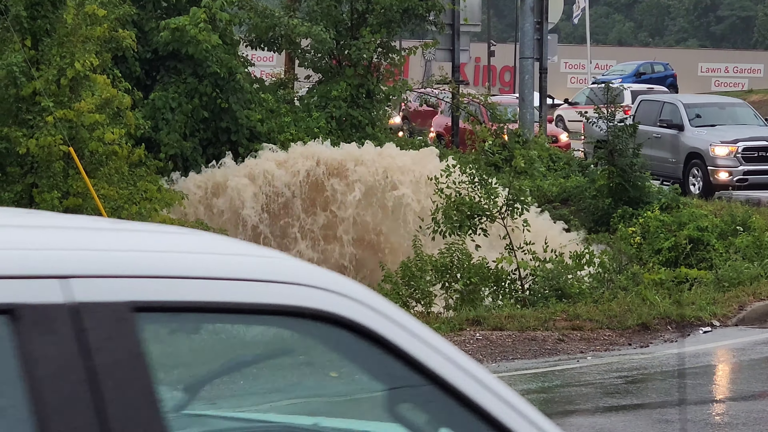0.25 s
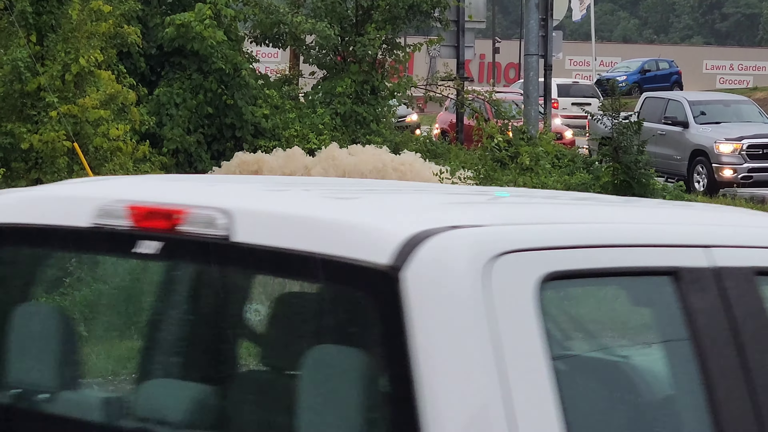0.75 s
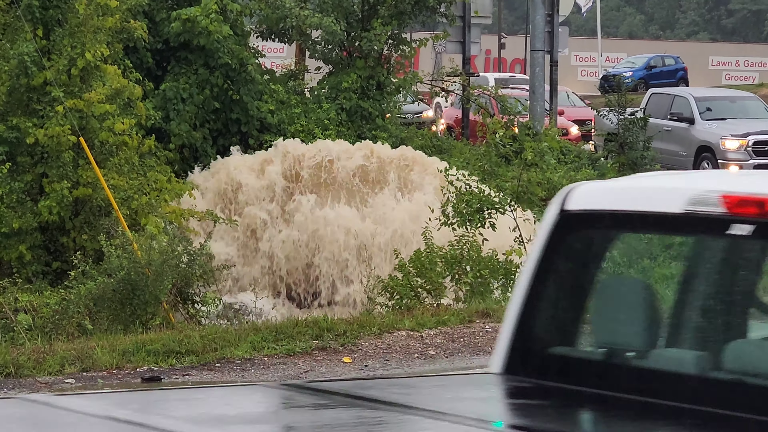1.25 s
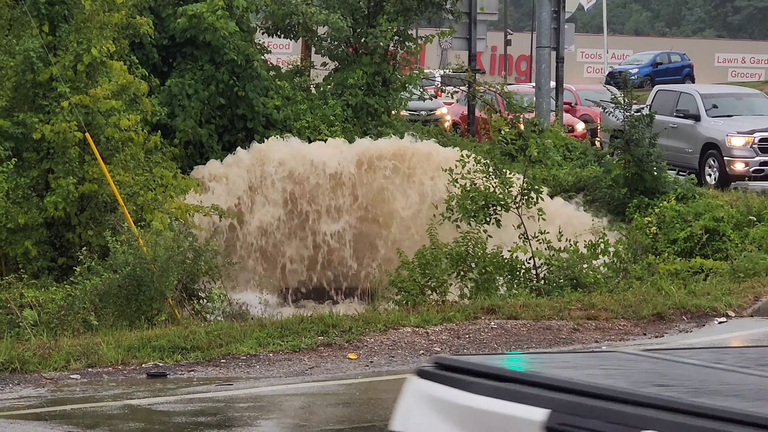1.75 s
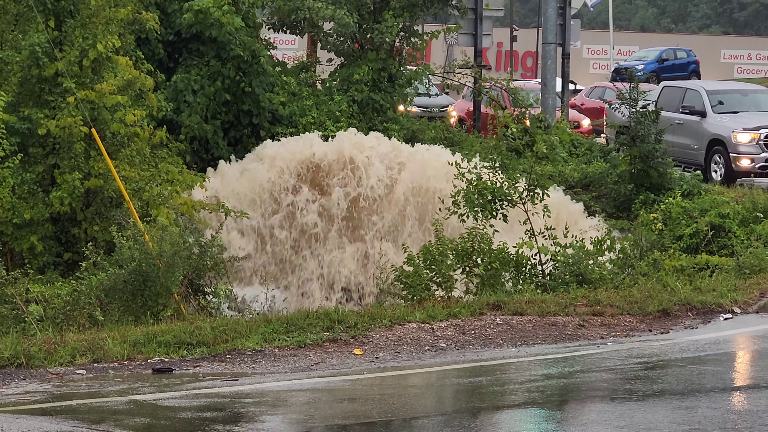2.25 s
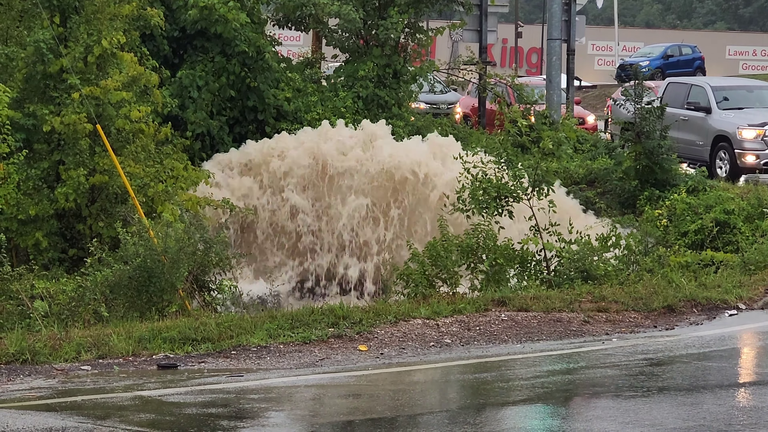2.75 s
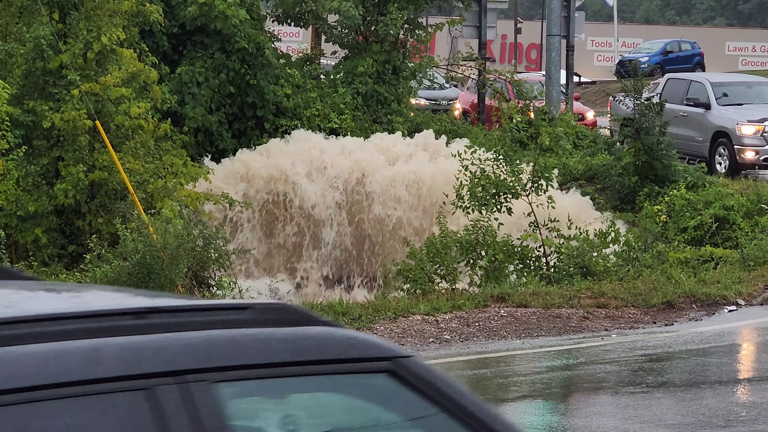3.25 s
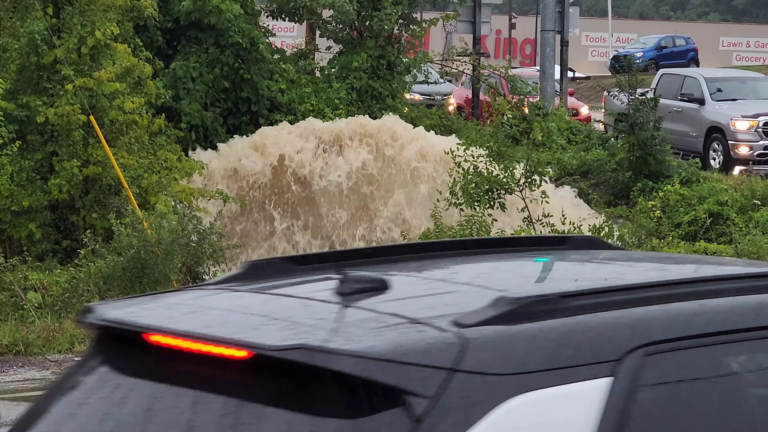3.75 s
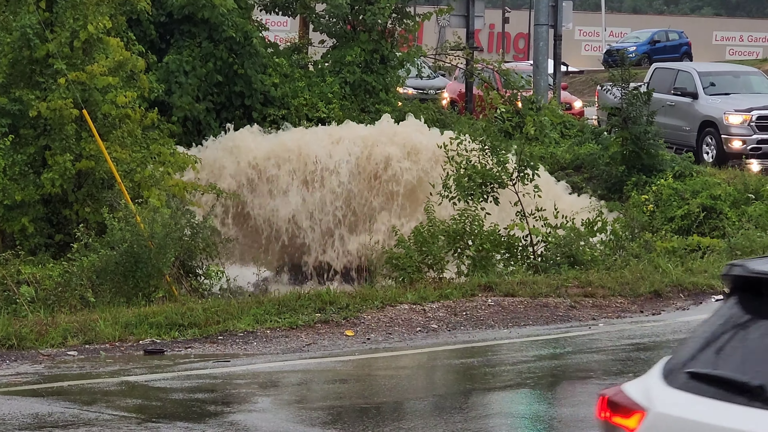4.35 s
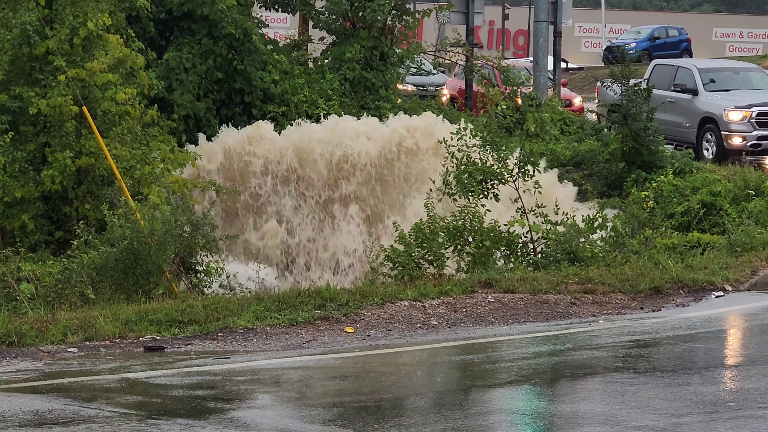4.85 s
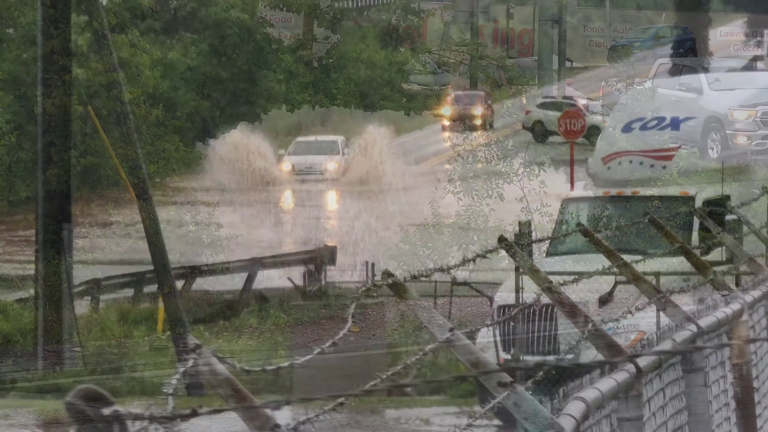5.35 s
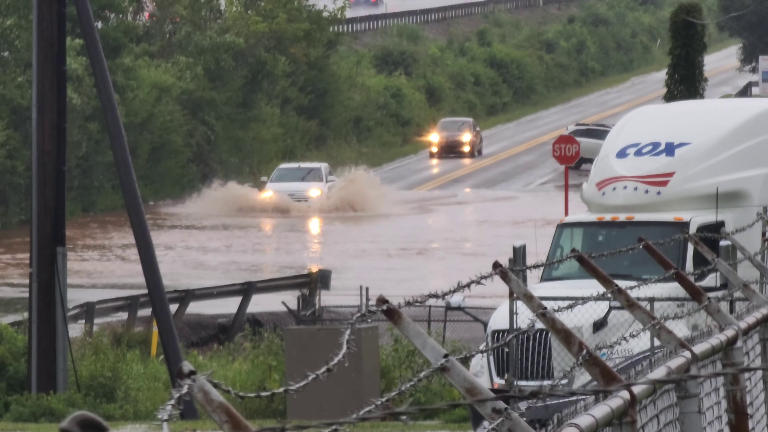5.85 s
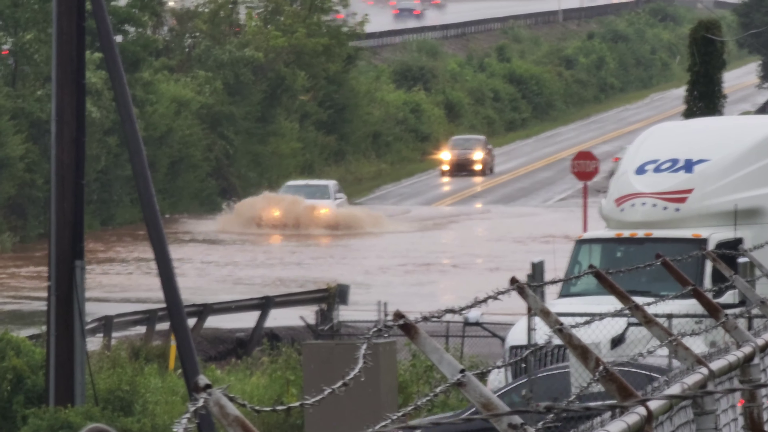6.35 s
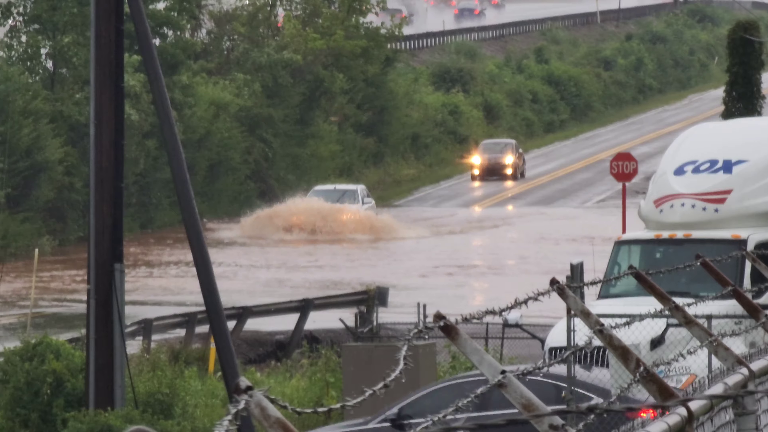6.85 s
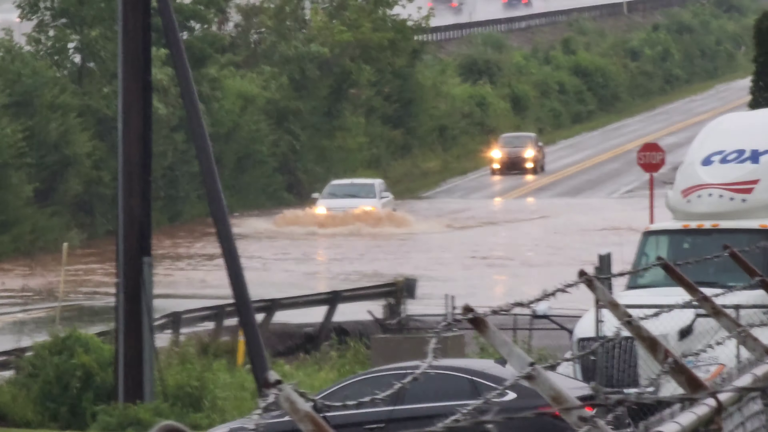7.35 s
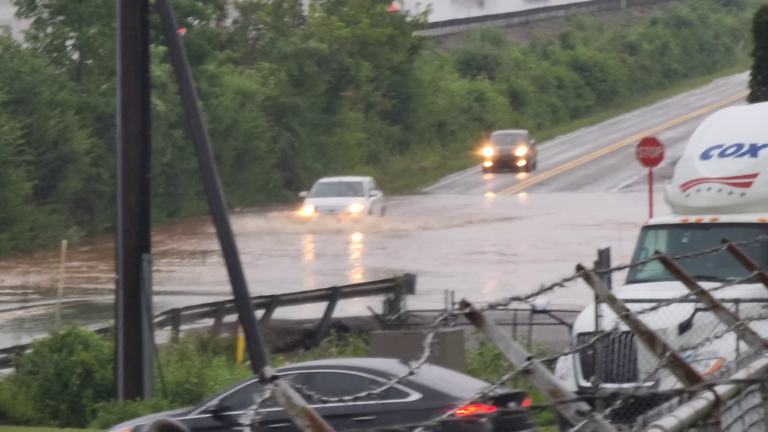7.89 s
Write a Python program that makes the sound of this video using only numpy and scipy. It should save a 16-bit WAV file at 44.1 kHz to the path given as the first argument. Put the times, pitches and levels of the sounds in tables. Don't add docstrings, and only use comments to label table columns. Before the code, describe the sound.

Floodwater rushes continuously, bright and broad, while engines hum low and tyres swish across wet asphalt. A quick metallic rattle comes early, with a few sharp drips and light knocks later. After a smooth crossfade midway, a car ploughs through water with a burst of hiss, spray ebbs over engine drone and faint fan air, and a far but powerful thunder peal rumbles. Open air, wide stereo, wind on the microphone.

```python
import sys
import numpy as np
from scipy import signal
from scipy.fft import rfft, irfft, next_fast_len
from scipy.io import wavfile
from scipy.ndimage import uniform_filter1d, map_coordinates

SR = 44100
rng = np.random.default_rng(int(sys.argv[2]) if len(sys.argv) > 2 else 0)


def inscribe(sig):
    pcm = np.round(np.clip(np.atleast_2d(sig).T, -1, 1) * 32767)
    wavfile.write(sys.argv[1], SR, pcm.astype(np.int16))


def volts_from_decibels(level):
    exponent = np.asarray(level, float) / 20
    return 10 ** exponent


N = 358091
DISSOLVE_START_S, DISSOLVE_END_S = 4.87, 5.68


def unit(x):
    return x / np.sqrt(np.mean(x ** 2) + 1e-20)


def along(points, hz):
    f, *columns = np.transpose(points)
    return np.array([np.interp(np.log(hz + 1), np.log(f + 1), c) for c in columns])


def closed(spectrum):
    floor = [-120] * (len(spectrum[0]) - 1)
    return [(spectrum[0][0] / 4, *floor)] + list(spectrum) + [(spectrum[-1][0] * 3, *floor)]


def wobble(rate, count=N):
    coarse = np.arange(0, count + 16, 16)
    knots = rng.standard_normal(int(count * rate / SR) + 4)
    smooth = map_coordinates(knots, [coarse * rate / SR])
    return np.interp(np.arange(count), coarse, smooth)


def hump(t, at, db, rise, fall):
    return db - 10 * np.maximum((at - t) / max(rise, .02), (t - at) / max(fall, .02))


def spread(slow):
    return np.repeat(slow, 64, axis=-1)[..., :N]


def filtered(x, response):
    m = next_fast_len(N + 8192)
    return irfft(rfft(x, m) * response(np.fft.rfftfreq(m, 1 / SR)), m)[..., :N]


def rush(spectrum, ports, patchy_db, excite=1):
    z = signal.stft(excite * rng.standard_normal((2, N)), nperseg=512)[2]
    field = uniform_filter1d(rng.standard_normal(z.shape[1:]), size=8, axis=0)
    field = uniform_filter1d(field, size=8, axis=1)
    pair = signal.istft(z * volts_from_decibels(patchy_db * unit(field)), nperseg=512)[1][:, :N]
    m = next_fast_len(N)
    hz = np.fft.rfftfreq(m, 1 / SR)
    alike, lead = along(ports, hz)
    turn = np.arccos(np.clip(alike, 0, 1)) / 2
    common, apart = rfft(pair, m) * [np.cos(turn), np.sin(turn)]
    left = (common + apart) * np.exp(.5j * lead)
    right = (common - apart) * np.exp(-.5j * lead)
    coloured = np.array([left, right]) * volts_from_decibels(along(closed(spectrum), hz)) * (hz > 12)
    return unit(irfft(coloured, m)[:, :N])


def puffs(times, levels_db, t60s, rise):
    power, t = np.zeros(N + SR), np.arange(SR // 2) / SR
    for s, db, t60 in zip(times, levels_db, t60s):
        envelope = volts_from_decibels(db - 60 * t / max(t60, .002)) * (1 - np.exp(-t / rise))
        power[round(s * SR):][:len(t)] += envelope ** 2
    return np.sqrt(power[:N])


def panned(table, shift_db, t60, rise):
    rows = np.array(table)
    t60s = np.full(len(rows), t60)
    return np.array([puffs(rows[:, 0], rows[:, 1] + side * rows[:, -1] + shift_db, t60s, rise)
                     for side in (.5, -.5)])


def splashes(depth_db):
    return volts_from_decibels(depth_db * wobble(220) + .4 * wobble(30) + .3 * wobble(7))


def dissolve():
    t = np.arange(N) / SR
    return np.clip((t - DISSOLVE_START_S) / (DISSOLVE_END_S - DISSOLVE_START_S), 0, 1)


# hz, left_db_per_hz, right_db_per_hz
DRAIN_WATER = [(418, -0.5, 0.5), (750, -1.5, 0), (1410, -4.5, 0), (2280, 1, -7.5), (2480, -2, -6),
               (3550, -5.5, -16), (4720, -16, -40), (5420, -8, -28), (7510, -10.5, -12), (7560, -19, -4.5),
               (9800, -16.5, -22), (11720, -14.5, -7), (13200, -15, -21), (15700, -16.5, -33)]
# hz, likeness_0_to_1, left_lead_rad
DRAIN_PORTS = [(300, 0.4, 1), (520, 0.79, 0.73), (950, 0.1, -0.66), (1760, 0.11, 0), (2190, 0.7, -2.5),
               (3370, 0, -6.5), (6400, 0.73, -12.5), (6450, 0.75, -11.5), (11120, 0, -12),
               (11020, 1, -12.5), (12900, 1, -12), (13300, 0, 5)]
# middle_s, loss_db, half_length_s
LULLS = [
    (0.831, 2, 0.18),
    (2.012, 1.5, 0.13),
    (3.697, 1, 0.12),
    (4.595, 1.5, 0.16),
    (5.152, 2, 0.19),
]


def gush(fade):
    t = np.arange(N) / SR
    lost_db = sum(db * np.exp(-.5 * ((t - s) / span) ** 2) for s, db, span in LULLS)
    level_db = -28 - 0.16 * wobble(2.746) - lost_db
    jet = rush(DRAIN_WATER, DRAIN_PORTS, patchy_db=0.5, excite=splashes(depth_db=0.5))
    return volts_from_decibels(level_db) * jet * np.cos(fade * np.pi / 2)


# hz, left_db_per_hz, right_db_per_hz
ROAD_WATER = [(324, -9, -9), (990, -6.5, -6), (1620, -6, -6), (2036, -5.5, -4.5), (2580, -8, -6.5),
              (3930, -14, -1.5), (4600, -23, -10), (4700, -14.5, -6.5), (6230, -16, -26),
              (7100, -16.5, -41), (7130, -18.5, -14), (8570, -14.5, -18), (10040, -28, -22.5),
              (11800, -27, -18.5), (15500, -26, -29)]
# hz, likeness_0_to_1, left_lead_rad
ROAD_PORTS = [(300, 1, 0.3), (500, 0.29, 1.1), (646, 1, 0.96), (1240, 0.31, 2.4), (1730, 0.69, 2.27),
              (2160, 0.051, 4.66), (6500, 0.1, 4.1), (6900, 0.22, 6.6), (9400, .3, 4), (9700, 0.96, 6.7),
              (13000, 1, 6.28), (14000, .2, 6.28)]


def spray(fade):
    rise_db_per_s, ebb_db_per_s = 5, 0.73
    level_db = hump(np.arange(N) / SR, 6.09, -23, 10 / rise_db_per_s, 10 / ebb_db_per_s)
    water = rush(ROAD_WATER, ROAD_PORTS, patchy_db=-0.04, excite=splashes(depth_db=0.0))
    return volts_from_decibels(level_db) * water * np.sin(fade * np.pi / 2)


# hz, left_db_per_hz, right_db_per_hz
BOW_WAVE = [(1800, -28, -24), (2300, -14, -5), (3000, -12, -6), (3720, -11, 2), (4300, -16, -5),
            (7000, -29, -20)]


def bow_wave():
    peak_s, spread_s = 5.8, 0.12
    swell = np.exp(-.5 * ((np.arange(N) / SR - peak_s) / spread_s) ** 2)
    return volts_from_decibels(-27.5) * swell * rush(BOW_WAVE, ROAD_PORTS, patchy_db=0.0)


# nearest_s, level_db, distance_over_speed_s, film_hiss_db
PASSES = [
    (.55, -31.5, 0.29, -14),
    (1.3, -30.5, 0.65, -9),
    (2.4, -48, 0.42, -12),
    (4.0, -31.5, 0.47, -6),
    (4.9, -36.5, 0.48, -1),
]
# hz, level_db_per_hz
TREAD = [(450, -8.5), (750, -8.5), (1300, 2), (1700, -0.5), (2200, -26)]
# hz, level_db_per_hz
FILM = [(1500, -36), (1850, -4), (2200, -0.5), (2500, -19)]


def tyres(fade):
    t = np.arange(0, N, 64) / SR
    swing_db = 2
    near, wet = 0, 0
    for s, db, span, film_db in PASSES:
        sweep_db = np.outer([1, -1], swing_db * np.arctan((t - s) / span))
        power = volts_from_decibels(2 * db + sweep_db) / (1 + ((t - s) / span) ** 2)
        near = near + power
        wet = wet + power * volts_from_decibels(2 * film_db)
    film = spread(np.sqrt(wet)) * rush(FILM, DRAIN_PORTS, patchy_db=3)
    tread = spread(np.sqrt(near)) * rush(TREAD, DRAIN_PORTS, patchy_db=1.0)
    return (tread + film) * (1 - fade)


def tone(rows, waver, octave_db=-60, flutter_db=1):
    s, hz, db = np.transpose(rows)
    at = np.arange(max(round(s[0] * SR) - 1400, 0), min(round(s[-1] * SR) + 1400, N))
    t, out = at / SR, np.zeros(N)
    edge = np.clip(np.minimum(t - s[0], s[-1] - t) / 0.034 + .5, 0, 1)
    pitch = np.interp(t, s, hz) * (1 + waver * wobble(12.04, count=len(t)))
    phase = 2 * np.pi * np.cumsum(pitch) / SR
    level = volts_from_decibels(np.interp(t, s, db) + flutter_db * wobble(14, count=len(t)))
    out[at] = np.sqrt(2) * level * edge * (np.sin(phase) + volts_from_decibels(octave_db) * np.sin(2 * phase))
    return out


# time_s, pitch_hz, level_db
FIRST_CAR = [
    (0.55, 44.7, -28),
    (0.58, 45.5, -35),
    (0.844, 48.8, -24.5),
    (1.086, 52.74, -13),
    (1.298, 54.8, -16.5),
    (1.55, 54.9, -28),
]
# time_s, pitch_hz, level_db
SECOND_CAR = [
    (2.049, 78.8, -41),
    (2.28, 74.54, -17.5),
    (2.52, 69.5, -23),
    (3.1, 72, -25),
    (3.5, 74.97, -27.5),
    (3.8, 76, -22),
    (4.0, 74.8, -33),
    (4.2, 71.4, -31),
]
# time_s, pitch_hz, level_db
CLIMBING_CAR = [
    (4.499, 67.05, -25),
    (4.95, 65.47, -26.5),
    (5.57, 75.84, -34),
    (5.82, 84.3, -28.5),
    (6.44, 91, -24.5),
    (6.82, 98.5, -20.5),
    (7.03, 99.5, -23),
    (7.2, 107.5, -25),
]
# time_s, pitch_hz, level_db
LAST_CAR = [
    (7.2, 92.4, -22),
    (7.376, 86.2, -21),
    (7.636, 87.5, -20),
    (7.82, 75, -19),
    (8.12, 82.3, -26),
]
# peak_s, pitch_hz, glide_hz_per_s, level_db, rise_10_db_s
REVS = [(0.47, 56.5, 5, -20, 0.2), (0.49, 64, -9, -24.5, 1.5), (.95, 75, 21, -17.5, -0.22),
        (0.46, 104.3, -18, -21.5, 0.05), (.3, 212, -16.5, -33.5, 0.5), (.72, 204, -32, -36, .16),
        (.95, 128, 0, -21, -0.24), (1.74, 103, 5, -30.5, 0.3), (1.87, 61, -17, -21, 0.06),
        (1.97, 200, 0.5, -33, 0.55), (2.12, 200, 9, -31, 0), (2.7, 88.7, 0.0, -27, 0),
        (2.7, 86, -6.5, -42.5, 0.6), (1.13, 272, 16.5, -41, 0.5), (3.55, 183, 17, -34.5, 0.13),
        (3.16, 245, -10, -43, 0.15), (4.2, 280, 22, -38, 0.25), (4.22, 178, 7, -29, 0.16),
        (4.51, 184, 13.5, -31, .045), (4.5, 292, 19.5, -42, -0.16), (6, 97, -7.5, -28, 0.3)]


def exhausts():
    fall_over_rise = 1.35
    notes = [FIRST_CAR, SECOND_CAR, CLIMBING_CAR, LAST_CAR]
    for s, hz, glide, db, rise in REVS:
        offsets = (-1.5 * rise, 0, 1.55 * fall_over_rise * rise)
        notes.append([(s + d, hz + glide * d, db - 15 * (d != 0)) for d in offsets])
    return sum(tone(rows, waver=.01, octave_db=-21, flutter_db=1.7) for rows in notes)


def turbo():
    start_s, peak_s, rise_s, fall_s = .64, .85, .25, .6
    top_hz, below_hz, spool_s = 14900, 1600, .23
    t = np.linspace(start_s, peak_s + fall_s, num=20)
    pitch = top_hz - below_hz * np.exp(-(t - start_s) / spool_s)
    rows = np.transpose([t, pitch, hump(t, peak_s, -53.5, rise_s, fall_s)])
    whistle = tone(rows, waver=.004) * (.6 + wobble(300))
    return whistle * volts_from_decibels([[4], [-8]])


# time_s, peak_db, lower_modes_db, left_minus_right_db
CLANKS = [(0.742, -26, 0, -1.0), (0.917, -33, 0, 0.0), (1.018, -13.5, 0, 3), (1.026, -9, -2, 0),
          (1.037, -5.5, -5, -3), (1.05, -11, -3, 8), (1.064, -14, -2, -4), (1.09, -22, 5, 0),
          (1.119, -14.5, 4, 1), (1.14, -25, 3, 0), (1.165, -27, 1, 0), (1.202, -21.5, -2, 0),
          (1.225, -25, 1, 0), (1.248, -16, -1, -1), (3.811, -20, 2, 2), (3.844, -30, 1, -4),
          (3.957, -20, 0, 0.5), (5.012, -21.5, 6.5, 3), (5.017, -14, 3, 10)]
# centre_hz, width_hz, level_db
PANEL = [
    (447, 280, -5),
    (897, 460, 2.5),
    (1350, 350, 4.5),
]
# centre_hz, width_hz, level_db
BRACKET = [
    (1660, 270, 9),
    (2075, 210, 4),
]


def clanks():
    out = 0
    for modes, lower_share in ((PANEL, 1), (BRACKET, 0)):
        def ring(f):
            return sum((-1) ** k * volts_from_decibels(db) * 1j * f * width / (centre ** 2 - f * f + 1j * f * width)
                       for k, (centre, width, db) in enumerate(modes))
        shift_db = -8 + lower_share * np.array(CLANKS)[:, 2]
        shake = panned(CLANKS, shift_db, t60=0.058, rise=.003)
        noise = rng.standard_normal((3, N))
        force = 1.1 * noise[2] + 0.46 * noise[:2]
        out = out + filtered(shake * force, ring) / np.std(filtered(force, ring))
    return out


# time_s, peak_db, left_minus_right_db
DROPS = [(1.013, -31, -2.0), (2.5364, -28, -1.0), (2.5696, -20, 8), (2.5814, -30, 0), (2.5994, -29, 1.5),
         (2.6264, -29, -2), (2.9078, -9, -7), (3.1604, -21, -1.5), (3.3276, -5, 5), (3.3854, -19.5, -1.5),
         (4.0374, -23, -2.0), (4.3221, -28.5, -2.0), (4.6734, -27, -0.5), (5.8104, -21.5, -3)]


def drops():
    tick = panned(DROPS, -3, t60=.007, rise=.0004)
    return filtered(tick * rng.standard_normal(N),
                    lambda f: 1 / (1 + (7500 / (f + 1)) ** 4) / (1 + (f / 13000) ** 6))


# time_s, peak_db, boom_db, crack_db, knock_hz
PEALS = [(7.045, 0.5, -7, -17, 172), (7.052, -1, -1, -14, 126.2), (7.06, -7, -14, -14, 300),
         (7.072, -13, -9, -8, 328), (7.096, -6, -12, -12, 454), (7.085, -3, -7, -20, 140),
         (7.109, -4, -13, 0.5, 657), (7.117, -3, 1, -14, 263), (7.133, 0, -5, -10, 347),
         (7.206, -18, -2, -4, 137), (7.256, -7, -15, -3.5, 142), (7.276, -5.5, -6, -4, 128),
         (7.396, -11.5, -14, -2, 560), (7.419, -8, -5, -5, 149), (7.45, -16, -6, 1, 300),
         (7.499, -14, -2, 2, 475), (7.519, -12.5, -2, 2, 420), (7.54, -8.5, 9, -0.5, 384),
         (7.562, -11, 0, 1, 327), (7.584, -8, -6, -6, 485), (7.6, -10, -6, -3, 473),
         (7.632, -3.5, -14, -7, 320), (7.645, -7, -8, -11, 520), (7.659, -3, -14, -14, 136),
         (7.699, -5, 3, -3, 146), (7.764, -9.5, 12, -15, 132.8), (7.72, -13, -3, -6, 160),
         (7.785, -7, 4, 0, 270), (7.81, -11, 3, -5, 200), (7.918, -12, -8, -13, 132)]
# hz, level_db_per_hz
BOOM = [(25, -40), (50, 5), (90, 0), (150, 4), (200, -46)]
# hz, level_db_per_hz
BODY = [(120, -25), (200, -17), (350, 2), (500, 1), (650, -46)]
# hz, level_db_per_hz
CRACK = [(450, -24), (600, -9.5), (850, -10.5), (1000, -13), (1400, -14), (3000, -42)]
# hz, likeness_0_to_1, left_lead_rad
SKY_PORTS = [(59.7, .99, -1), (200, 0.96, 0.6), (349.6, 0.67, .5), (808, 0.54, 2), (1500, 0.6, 6.5)]


def thunder():
    s, db, boom_db, crack_db, knock_hz = np.transpose(PEALS)
    life_s = 0.066
    t60 = np.full(len(s), life_s)
    peals = 0
    for colour, gain_db, last in [(BOOM, boom_db - 12.5, 2.2), (BODY, -11, 1.4), (CRACK, crack_db - 0.5, 1.2)]:
        burst = rush(colour, SKY_PORTS, patchy_db=-1.0)
        peals = peals + puffs(s, db + gain_db, t60 * last, rise=0.0033) * burst
    knocks, t = np.zeros(N + SR), np.arange(SR // 4) / SR
    onset = 1 - np.exp(-t / 0.0034)
    for at, level_db, low_db, hz in zip(s, db, boom_db, knock_hz):
        knock = volts_from_decibels(level_db - 2.0 - 60 * t / (0.82 * life_s)) * np.sin(2 * np.pi * hz * t) * onset
        thud = volts_from_decibels(level_db + low_db - 6.0 - 60 * t / (2.7 * life_s)) * np.sin(2 * np.pi * 82 * t)
        knocks[round(at * SR):][:len(t)] -= knock + thud
    fronts = filtered(peals + knocks[:N], lambda f: 1 / (1 - (f / 950) ** 2 + 1.3j * f / 950) ** 2)
    tail_colour = BODY[:4] + [(850, -6), (1100, -25), (2000, -45)]
    tail = rush(tail_colour, SKY_PORTS, patchy_db=2, excite=volts_from_decibels(2 * wobble(40)))
    return fronts + puffs(s, db - 21.5, np.full(len(s), 0.54), rise=0.013) * tail


# hz, level_db_per_hz
FAN = [(500, -42), (640, 2), (750, 2), (860, 1), (1050, -40)]


def lorry_fan(fade):
    level_db = -37.0 + 0.45 * wobble(3.07)
    return volts_from_decibels(level_db) * rush(FAN, ROAD_PORTS, patchy_db=0.5) * np.sqrt(fade)


# time_s, level_db
STREET = [(0, -27), (.6, -29.5), (1.35, -28), (2.3, -27.5), (2.8, -30.5), (4.4, -31.5), (5.06, -29),
          (5.25, -33.5), (5.55, -33), (5.8, -32), (7.04, -33), (7.12, -25), (7.37, -28.5), (7.75, -24),
          (8.12, -26.5)]
# peak_s, level_db, fall_10_db_s
GUSTS = [(0.0, -24, 1), (.45, -15, 0.08), (1.04, -17, 0.63), (2.3, -25, 0.4), (2.76, -20.5, 0.25),
         (3.82, -26.5, 1.5), (4.8, -26.5, -1), (5.5, -28, -0.3), (5.79, -18, -0.45), (5.99, -20, -0.1),
         (6.26, -19, -1.16), (6.8, -21.5, 3.3), (7.12, -21, -0.3), (7.8, -28, 0.5)]
# hz, level_db_per_hz
DEEP = [(15, -38), (30, -3.5), (55, 4), (95, 5.5), (125, -12.5), (180, -36)]
# hz, level_db_per_hz
GROWL = [(80, -35), (120, 2.5), (200, -5.5), (300, -8), (450, -14.5), (800, -38)]
# hz, likeness_0_to_1, left_lead_rad
STREET_PORTS = [(60, 0.98, -0.14), (140, 0.97, -0.26), (250, 1, 0.51), (503, 0.7, 0.94),
                (1200, 0.35, -1.37)]


def street_rumble():
    t = np.arange(0, N, 64) / SR
    street_db = np.interp(t, *np.transpose(STREET))
    gusts = sum(volts_from_decibels(2 * hump(t, s, db, span, span)) for s, db, span in GUSTS)
    push = volts_from_decibels(2 * (street_db - 5)) + gusts
    deep = spread(np.sqrt(push)) * rush(DEEP, STREET_PORTS, patchy_db=0.35)
    return deep + spread(volts_from_decibels(street_db)) * rush(GROWL, STREET_PORTS, patchy_db=-0.37)


def scene():
    fade = dissolve()
    water = gush(fade) + spray(fade) + bow_wave()
    vehicles = tyres(fade) + exhausts() + turbo()
    return water + vehicles + clanks() + drops() + thunder() + lorry_fan(fade) + street_rumble()


# lowest_hz, drain_time_share, road_time_share
MERGED = [(6891, 0.59, 0.64), (7580, 0.85, 0.78), (8269, 0.49, 0.56), (8958, 0.78, 0.8), (9647, 0.69, 0.32),
          (10336, 0.81, 0.38), (11025, 0.0, 0.01), (11714, 0.23, 0.15), (12403, 0.53, 0.53),
          (13092, 0.01, 0.78), (13781, 0.0, 0.48), (14470, 0.02, 0.58), (15159, 0.01, 0.5)]


def merged(x, opposed, lost):
    shift = 1024 - 146
    frame = dict(window=signal.windows.cosine(2048), nperseg=2048, noverlap=1024)
    z = signal.stft(np.pad(x, ((0, 0), (shift, 0))), **frame)[2]
    frames = z.shape[2]
    middle_s = (DISSOLVE_START_S + DISSOLVE_END_S) / 2
    place = (np.arange(frames) * 1024 / SR > middle_s).astype(int)
    mood = rng.standard_normal((len(MERGED), frames)) + 0.44 * rng.standard_normal(frames)
    mood = uniform_filter1d(mood, size=3, axis=1)
    chance = mood.argsort(1).argsort(1) / frames
    flips = rng.random(chance.shape) < opposed
    for (hz, *shares), u, flip in zip(MERGED, chance, flips):
        share = np.take(shares, place)
        band = z[:, round(hz * 2048 / SR):][:, :32]
        power = np.sum(abs(band) ** 2, axis=1) + 1e-20
        louder = np.where(power[0] > power[1], band[0], band[1])
        loud = louder * np.sqrt(power.mean(0) / power.max(0))
        opposite = loud * np.where(flip, -1, 1)
        joined = (u < share) | (flip & (abs(hz - 11400) > 800))
        band[:] = np.where(joined, [loud, opposite], band)
        band *= u > lost * share * (hz < 7000)
    return signal.istft(z, **frame)[1][:, shift:shift + N]


def low_pass(x):
    return signal.sosfilt(signal.butter(12, 15870, fs=SR, output="sos"), x)


def record(dry):
    duck_s, duck_db, fall_s, recover_s = 7.06, 1.24, 0.036, 2.3
    since = np.maximum(np.arange(N) / SR - duck_s, 0)
    held = dry * volts_from_decibels(-duck_db * (1 - np.exp(-since / fall_s)) * np.exp(-since / recover_s))
    soft = held / (1 + np.abs(held / .98) ** 8) ** (1 / 8)
    mix = merged(soft, opposed=.065, lost=.08)
    return low_pass(mix)


dry = scene()
out = record(dry)
inscribe(out)
```